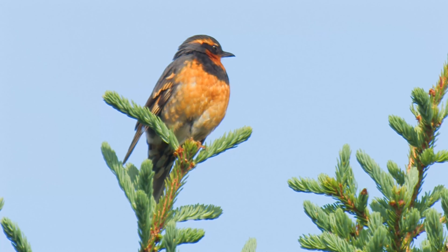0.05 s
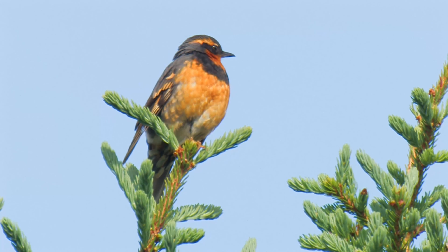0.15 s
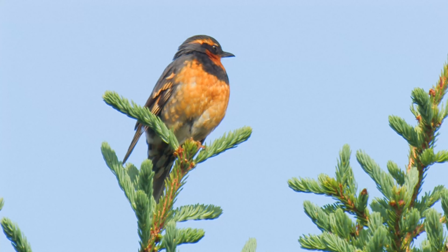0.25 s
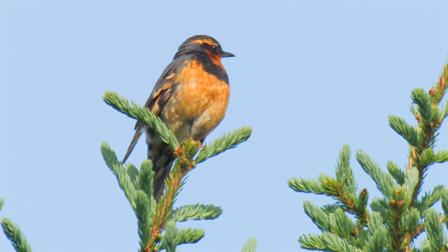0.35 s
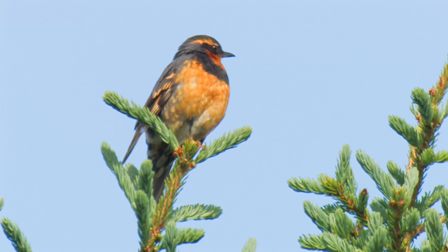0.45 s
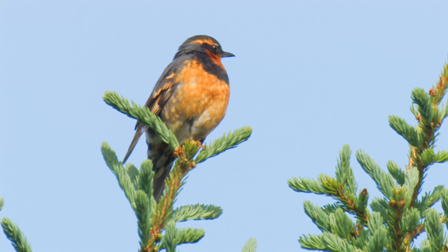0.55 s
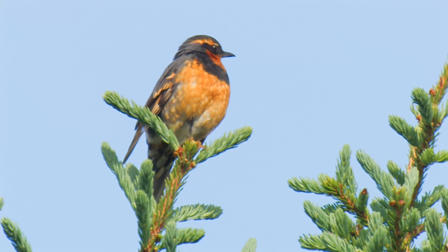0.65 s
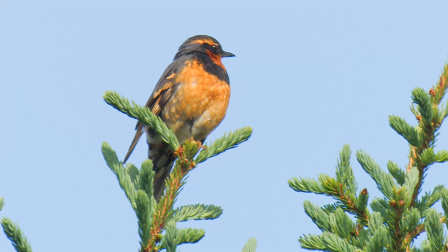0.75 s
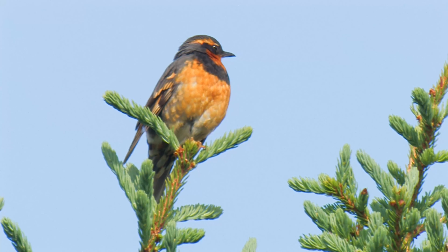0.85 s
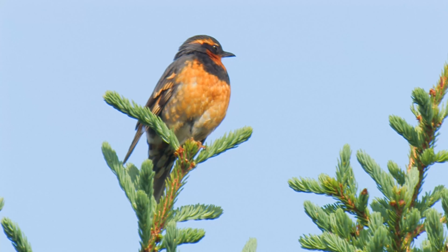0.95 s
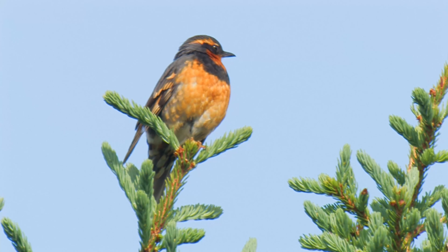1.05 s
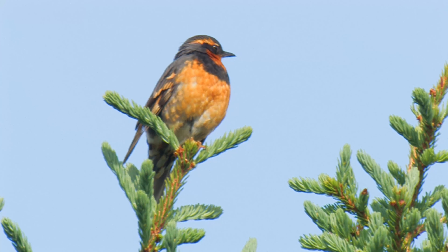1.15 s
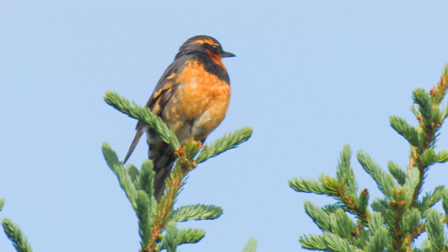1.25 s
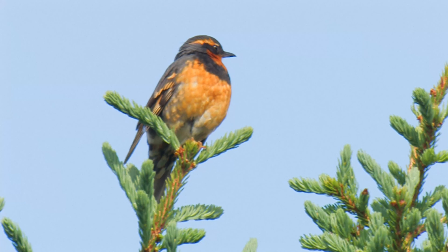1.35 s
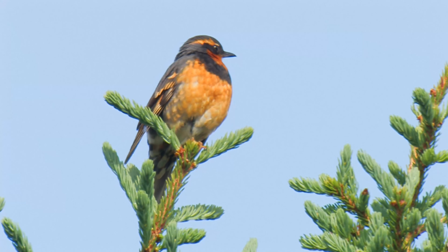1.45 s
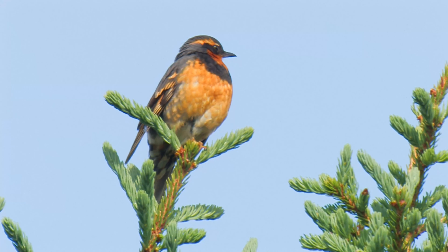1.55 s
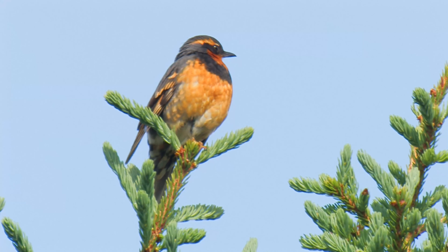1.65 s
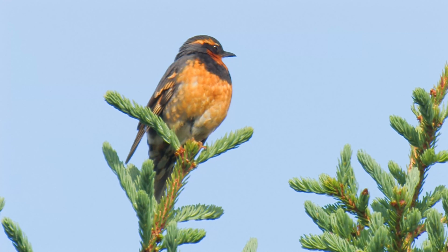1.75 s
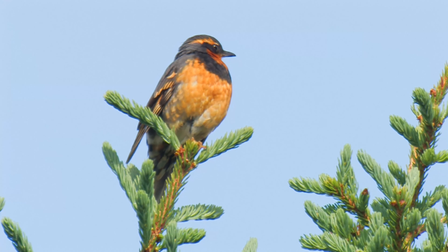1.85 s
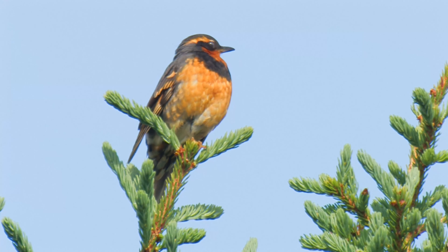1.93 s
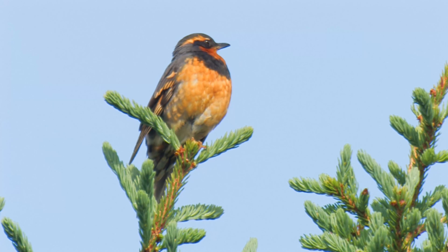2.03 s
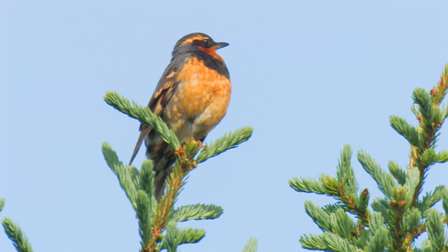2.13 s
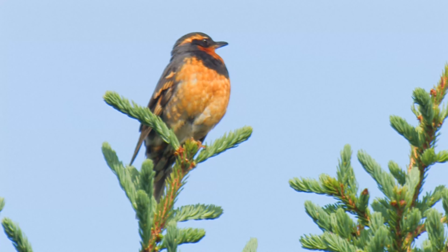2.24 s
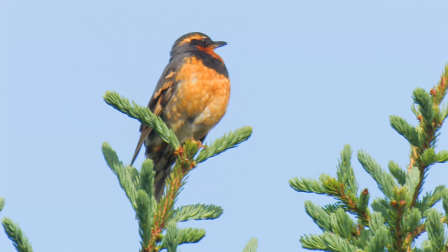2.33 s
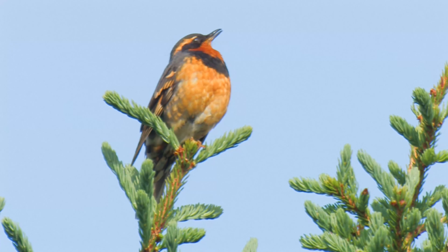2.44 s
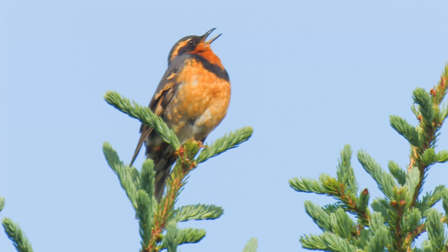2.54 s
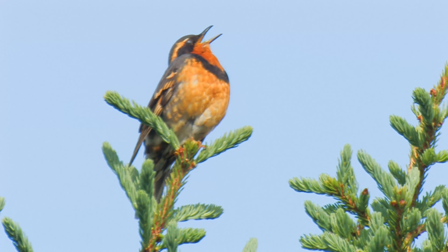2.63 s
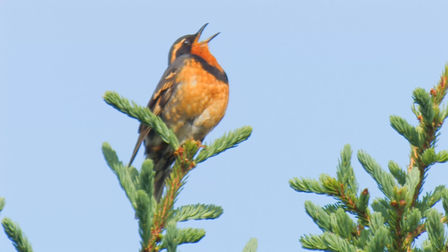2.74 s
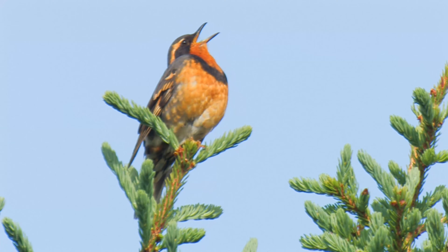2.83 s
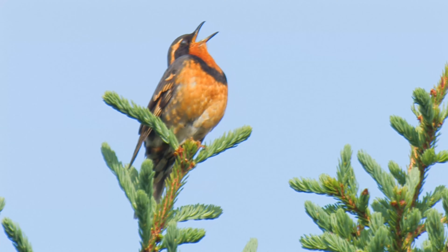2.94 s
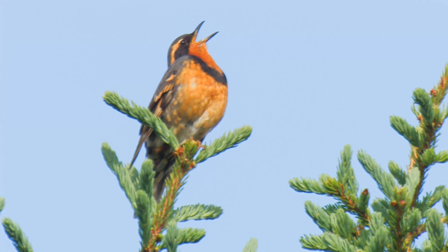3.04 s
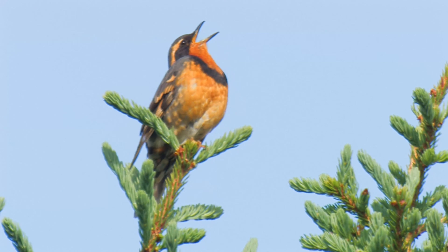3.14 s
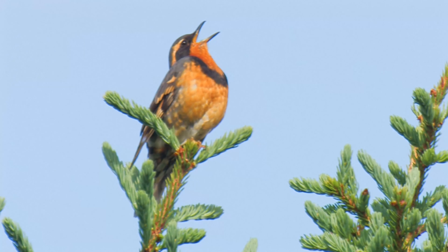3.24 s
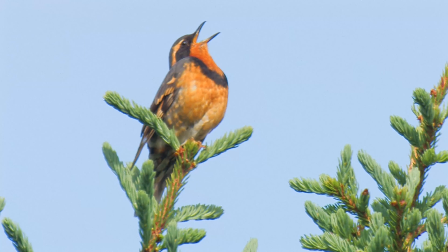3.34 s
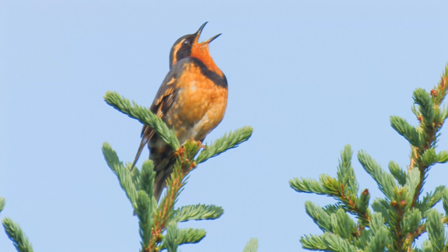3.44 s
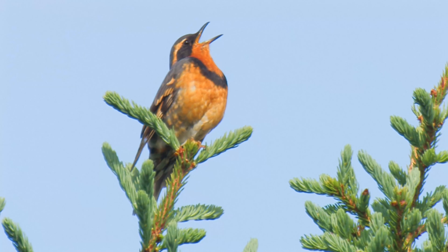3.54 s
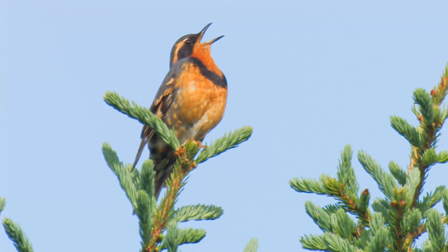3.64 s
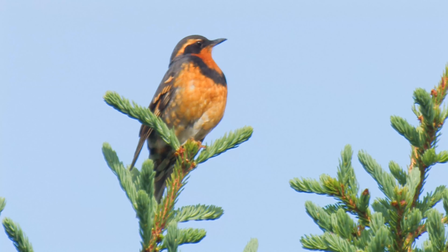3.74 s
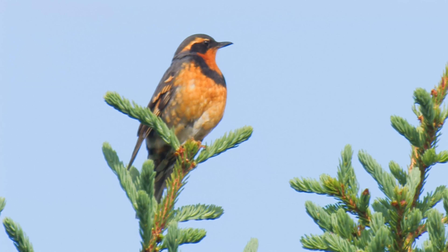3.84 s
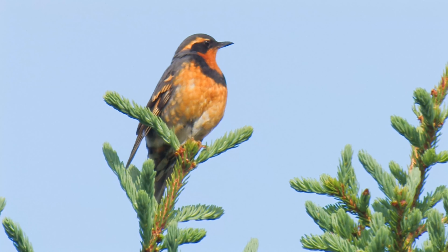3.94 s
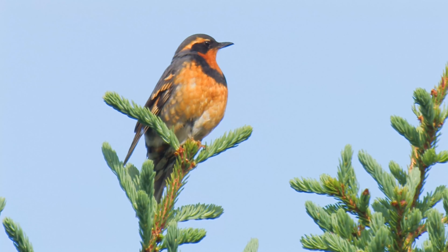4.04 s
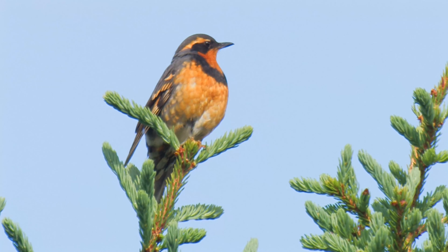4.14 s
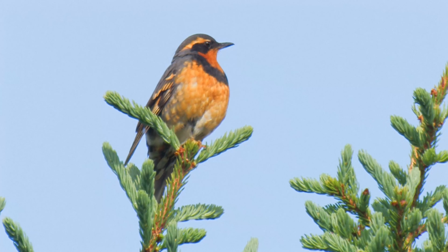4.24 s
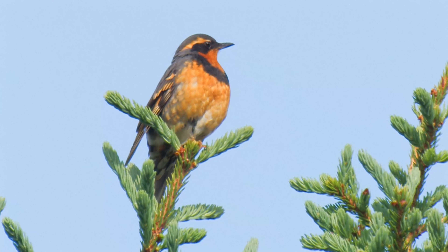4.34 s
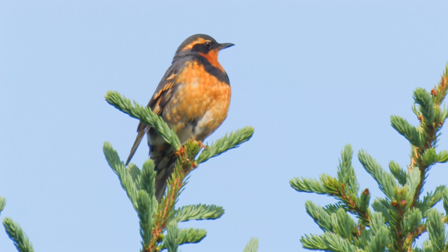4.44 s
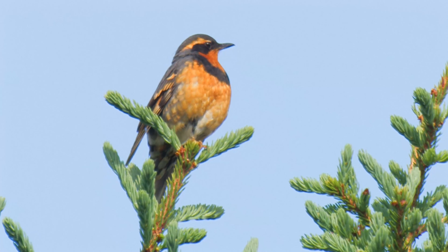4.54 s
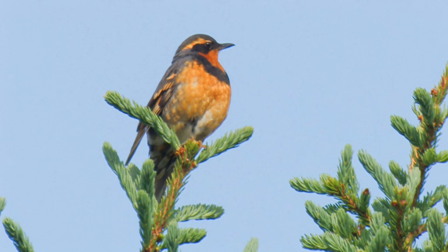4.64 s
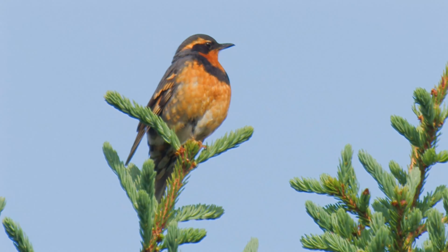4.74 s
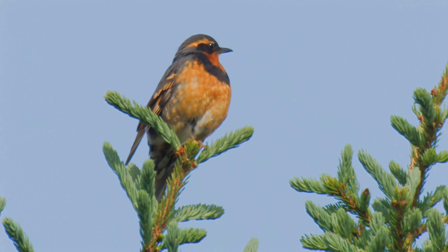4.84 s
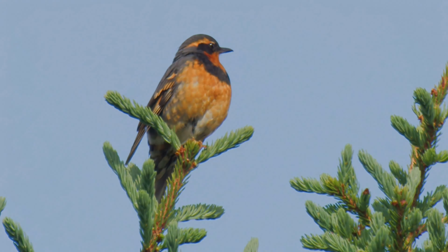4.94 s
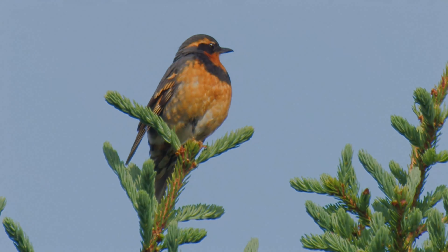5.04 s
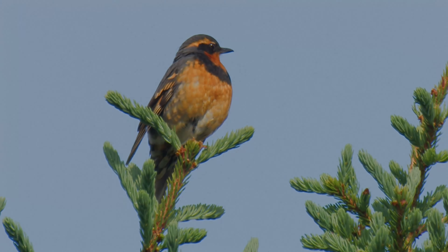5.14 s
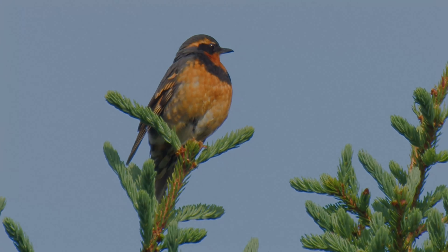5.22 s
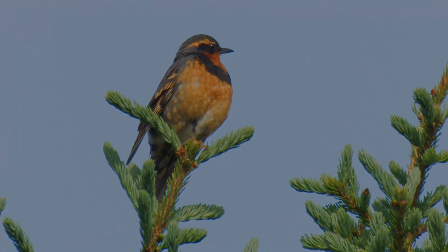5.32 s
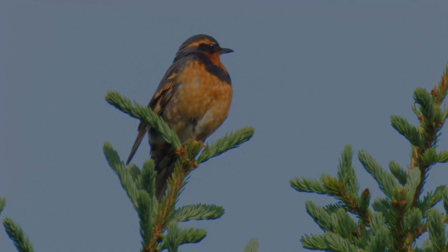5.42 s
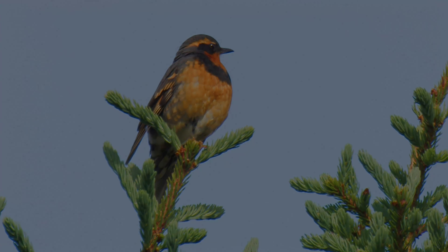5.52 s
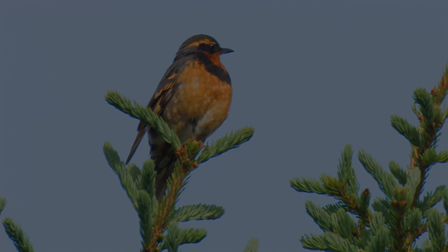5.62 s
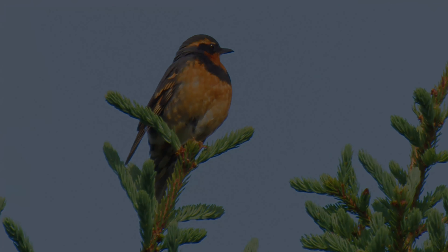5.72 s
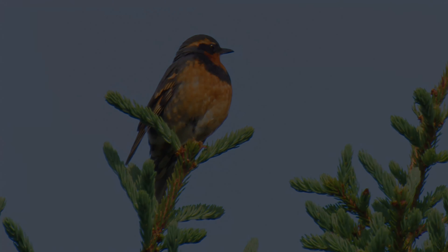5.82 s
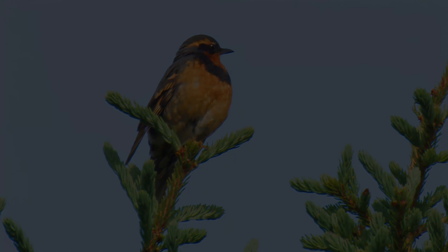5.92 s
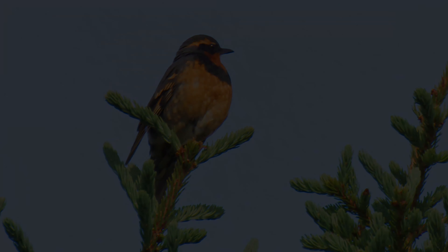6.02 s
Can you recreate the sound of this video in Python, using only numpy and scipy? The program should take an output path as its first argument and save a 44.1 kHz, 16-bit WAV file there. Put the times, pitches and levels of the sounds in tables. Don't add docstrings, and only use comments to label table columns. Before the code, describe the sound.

Open forest edge with soft, low distant wind. A warbler already in song tosses out quick slurs and chatter, blurred by tree echoes. Fainter birds repeat phrases and twitter far off. A nearer thrush then gives one long, level, buzzy whistle, sagging slightly before a short final push. After a brief gap, another bird trills rapid sharp down-slurs as everything fades. The microphone is outdoors at some distance, with woodland echo.

```python
import sys
import numpy as np
from scipy import signal
from scipy.fft import rfft, irfft
from scipy.io import wavfile
from scipy.ndimage import uniform_filter1d

SR = 44100
rng = np.random.default_rng(int(sys.argv[2]) if len(sys.argv) > 2 else 0)


def output_pcm(signal):
    pcm = np.clip(np.atleast_2d(signal).T, -1, 1) * 32767
    wavfile.write(sys.argv[1], SR, np.round(pcm).astype(np.int16))


def nominal_scale(level):
    x = np.asarray(level, float) / 20
    return 10 ** x


N = 267951

# bend (under 1 = quick start), start_db, end_db
RISE, HOOK, FALL, PLAIN = (1.4, -9.5, 0), (.4, 0, -4.5), (1.6, -6, 0), (1.2, 0.5, -2.2)


def evened(x):
    return x / np.sqrt(np.mean(x ** 2) + 1e-20)


def add(mix, start_s, sound):
    part = mix[round(start_s * SR):][:len(sound)]
    part += sound[:len(part)]


def coloured(points):
    hz, db = np.transpose(points)
    log_hz = np.log(np.fft.rfftfreq(N, 1 / SR) + 1)
    shape_db = np.interp(log_hz, np.log(hz), db, right=-90)
    return evened(irfft(rfft(rng.standard_normal(N)) * nominal_scale(shape_db), N))


def drift(size, smooth_samples):
    noise = rng.standard_normal(size)
    for _ in range(2):
        noise = uniform_filter1d(noise, smooth_samples)
    return evened(noise)


def note(mix, rows, start_s=0, pitch=1, db=0):
    s, hz, level_db = np.transpose(rows)
    t = np.arange(s[0], s[-1], 1 / SR)
    glide_hz = uniform_filter1d(np.interp(t, s, hz), len(t) // 8) * pitch
    tone = np.sqrt(2) * np.sin(2 * np.pi * (np.cumsum(glide_hz) / SR + rng.random()))
    envelope = nominal_scale(np.interp(t, s, level_db) + db) * signal.windows.tukey(len(t), .3)
    add(mix, start_s + s[0], tone * envelope)


def slur(mix, start_s, length_s, from_hz, to_hz, db, kind):
    bend, start_db, end_db = kind
    u = np.linspace(0, 1, 9)
    hz = from_hz + (to_hz - from_hz) * u ** bend
    swell_db = start_db + (end_db - start_db) * u
    note(mix, np.transpose([u * length_s, hz, swell_db]), start_s, db=db)


def forest(x, t60_s, gap_s):
    t = np.arange(2 * SR) / SR
    sparse = rng.standard_normal(len(t)) * (rng.random(len(t)) < .05)
    taps = sparse * nominal_scale(-60 * t / t60_s) * (t > gap_s)
    return signal.fftconvolve(x, taps / np.linalg.norm(taps))[:len(x)]


def thrush():
    # s, pitch_hz, level_db
    whistle = [
        (2.651, 3046, -37.5),
        (2.731, 3024, -39),
        (2.899, 2995, -35.5),
        (3.31, 2998, -30.5),
        (3.4, 2985, -32.5),
        (3.56, 2969, -33.5),
        (3.63, 2934, -31),
        (3.729, 2895, -31),
        (3.806, 2940, -35.5),
    ]
    # s, level_db, sidebands_db
    last_push = [
        (3.795, 0, 0),
        (3.81, -4, 0),
        (3.825, 5.5, -8),
        (3.84, 3, -8),
    ]
    # hz, db
    breath = [(1900, -35.5), (2300, -12), (2700, -1), (3000, 0), (3400, -10), (4200, -9.5), (5800, -28)]
    # level_db, one per offset in beats from the main voice
    faint_db = [-26, -19, -2, -12]
    faint_beats = (-3, -2, 2, 3)
    # level_db below the main voice, one per (multiple, offset in beats)
    overtone_db = [-41.5, -51, -48.5, -39.5, -52, -45]
    overtone_places = ((2, 0), (2, -1), (3, 0), (3, -1), (3, -2), (3, 1))

    s, pitch_hz, whistle_db = np.transpose(whistle)
    t = np.arange(s[0] - .015, last_push[-1][0], 1 / SR)
    size = len(t)
    hz = np.interp(t, s, pitch_hz)
    attack_db, attack_s = -20, .04
    level = np.interp(t, s, whistle_db) + attack_db * np.exp((s[0] - t) / attack_s)
    gap_hz = 145 + .14 * abs(hz - 2970)
    second = -6.3 - .12 * abs(hz - 2988)
    upper = np.clip(-28 + 24.5 * (t - 2.88), -28, -16.5)
    air = -59 + 1.2 * (level + 33.5) - 120 * np.maximum(t - 3.615, 0)

    push_s, push_db, purer_db = np.transpose(last_push)
    level += np.interp(t, push_s, push_db)
    purer = np.interp(t, push_s, purer_db)
    second, upper = second + purer, upper + purer

    main = 2 * np.pi * np.cumsum(hz + 5.8 * drift(size, 220)) / SR
    beat = 2 * np.pi * np.cumsum(gap_hz + 3.7 * drift(size, 400)) / SR
    tone = np.sin(main) + nominal_scale(second) * np.sin(main - beat) + nominal_scale(upper) * np.sin(main + beat - 2.2)
    for k, db in zip(faint_beats, faint_db):
        feed = second if k < 0 else np.minimum(upper, second - 8)
        tone += nominal_scale(db + 2 * feed + 2 * drift(size, 2000)) * np.sin(main + k * beat)
    strain = nominal_scale(.8 * (level + 32) + np.minimum(second + 11, 0) + .25 * (upper + 22))
    for (multiple, k), db in zip(overtone_places, overtone_db):
        tone += strain * nominal_scale(db + 1.8 * drift(size, 600)) * np.sin(multiple * main + k * beat)
    tone *= np.sqrt(2) * nominal_scale(level + 1.4 + 0.53 * drift(size, 250))
    tone += nominal_scale(air) * coloured(breath)[:size]

    out = np.zeros(N)
    add(out, t[0], tone * signal.windows.tukey(size, .02))
    near = forest(out, t60_s=.6, gap_s=.035)
    far = forest(out, t60_s=1.75, gap_s=.04)
    return out + nominal_scale(-16) * near + nominal_scale(-25) * far


def trill():
    # s, pitch_hz, level_db
    slide = [(-.010, 5587, -20), (0, 5240, -7), (.008, 4970, -2), (.014, 4497, 0.5), (.018, 4084, 10.5)]
    # s, pitch_hz, level_db
    flick = [(0, 7450, -36), (.003, 5856, -13), (.006, 4500, -3), (.009, 3590, -7)]
    flicks = [
        (0.0154, 1.5),
        (0.0213, -1.5),
    ]
    first_s, period_s, slowing_s = 4.2995, .05895, 4.8e-5
    soft_db, swell_s = -17, 0.2
    out = np.zeros(N)
    for k in range(30):
        start_s = first_s + period_s * k + slowing_s * k ** 2
        db = -42.5 + soft_db * np.exp((first_s - start_s) / swell_s)
        pitch = 1 + .006 * rng.standard_normal()
        note(out, slide, start_s, pitch, db)
        for late_s, flick_db in flicks:
            note(out, flick, start_s + late_s * pitch ** 4, pitch, db + flick_db)
    add(out, .0055, nominal_scale(-2.5) * out.copy())
    return out + nominal_scale(-11) * forest(out, t60_s=0.56, gap_s=0.027)


def warbler():
    # start_s, length_s, from_hz, to_hz, level_db
    rises = [
        (.005, 0.072, 3220, 4010, -46),
        (.035, .025, 4600, 5050, -58),
        (.24, .065, 3265, 4140, -45),
    ]
    # start_s, length_s, from_hz, to_hz, level_db
    hooks = [
        (.132, 0.02, 5360, 4510, -50),
        (.318, 0.023, 5730, 4360, -50),
        (.472, .06, 3200, 3860, -48.5),
        (.688, 0.0483, 3270, 3625, -55.5),
        (.755, .035, 3560, 3620, -68),
    ]
    # start_s, length_s, from_hz, to_hz, level_db
    falls = [
        (.14, 0.057, 5700, 4470, -46),
        (.372, .078, 5780, 4390, -49.5),
        (.6, .06, 5790, 4510, -53),
    ]
    # start_s, length_s, from_hz, to_hz, level_db
    links = [
        (0, 0.022, 4930, 4820, -54.5),
        (.13, 0.012, 4960, 5700, -51),
        (.455, 0.0153, 3550, 3090, -61),
        (.58, 0.0133, 4680, 5360, -50),
        (.655, 0.0112, 4800, 3350, -60),
        (.73, 0.019, 3670, 3050, -61),
    ]
    # share of length, share of pitch span, level_db
    stroke = [(0, 1, -2), (0.45, 0.363, -0.5), (.7, 0.05, 0.5), (0.999, 0.022, -1.5)]
    first_s, last_s, strokes = -.25, .97, 24
    bottom_hz, top_hz = 4300, 6050
    lead = round(-first_s * SR)
    clear, chatter = np.zeros(N + lead), np.zeros(N + lead)
    for rows, kind in ((rises, RISE), (hooks, HOOK), (falls, FALL), (links, PLAIN)):
        for start_s, *shape in rows:
            slur(clear, start_s - first_s, *shape, kind)

    share, span, stroke_db = np.transpose(stroke)
    for k, (late, length, top, loud) in enumerate(rng.random((strokes, 4))):
        start_s = first_s + (k + .8 * late) / strokes * (last_s - first_s)
        hz = bottom_hz + span * (top_hz - bottom_hz) * (.85 + 0.256 * top) - 300 * late ** 2
        rows = np.transpose([share * (0.0137 + 0.026 * length), hz, stroke_db])
        effort_db = -51 + 0.5 * start_s - 110 * max(start_s - 0.7, 0)
        note(chatter, rows, start_s - first_s, db=effort_db + 5.1 * (loud - .5))
    scatter = forest(nominal_scale(-1.5) * clear + nominal_scale(3) * chatter, t60_s=0.59, gap_s=.005)
    return (clear + nominal_scale(-5.5) * chatter + scatter)[lead:]


def far_birds():
    # s, pitch_hz, level_db
    phrase = [
        [(0, 5058, 9), (.015, 4482, -3.5), (.045, 4204, -0.5), (.09, 4053, -2.5)],
        [(.078, 3964, -3.5), (.088, 3590, -4.5), (.1, 3100, -11)],
        [(.085, 4280, -6.5), (.11, 3900, -5), (.13, 3625, -7.5)],
        [(.115, 2975, -9), (.125, 3317, 2), (.133, 3350, -3.5)],
    ]
    # start_s, pitch_factor, level_db
    phrases = [
        (0.953, 1, -70),
        (1.146, 0.99, -66),
        (1.335, 0.99, -60.5),
        (1.522, 0.99, -58),
        (1.706, 1.01, -60),
        (1.89, 1.006, -59),
        (2.074, 1.02, -56),
    ]
    # s, pitch_hz, level_db
    peep = [(0, 2620, -9.5), (.015, 2780, -6), (.022, 3050, 3)]
    out, peeps = np.zeros(N), np.zeros(N)
    for start_s, pitch, db in phrases:
        for rows in phrase:
            note(out, rows, start_s, pitch * rng.normal(1, .008), db + rng.normal(0, 1))
    add(out, .045, nominal_scale(-13) * out.copy())
    for k in range(10):
        note(peeps, peep, 1.835 + k * .0844, db=-67 + k * .35)
    scatter = forest(nominal_scale(0.2) * out + nominal_scale(-4) * peeps, t60_s=0.84, gap_s=.006)
    return nominal_scale(-1) * out + peeps + scatter


def twitter():
    # start_s, level_db
    high_strokes = [(2.255, -65), (2.29, -64), (2.315, -70), (2.34, -70), (2.37, -65), (2.41, -70),
                    (2.44, -69), (2.475, -74), (2.51, -71), (2.55, -77)]
    # start_s, level_db
    low_strokes = [(2.305, -58), (2.345, -61.5), (2.41, -62), (2.46, -63), (2.53, -64.5), (2.57, -65)]
    # start_s, length_s, from_hz, to_hz, level_db
    chips = [(.385, .025, 2330, 2410, -74), (0.417, .03, 2540, 2770, -74), (0.572, 0.013, 2340, 2280, -67),
             (0.58, .035, 1940, 2040, -74), (.805, 0.011, 2400, 2260, -72), (.92, 0.046, 2786, 2790, -72.5),
             (.98, .04, 3200, 3310, -76), (1.745, 0.069, 4180, 4158, -58), (1.91, 0.072, 4410, 4440, -63),
             (2.745, .01, 5410, 3800, -68), (3.76, 0.082, 4150, 4000, -78.5), (3.87, .09, 4100, 3950, -78),
             (3.998, .05, 3930, 4150, -77), (4.15, .06, 4000, 4170, -79), (4.233, 0.047, 3480, 3650, -79),
             (4.466, 0.027, 3634, 3530, -73)]
    high_hz, low_hz, stroke_s = (5020, 5770), (4270, 4780), .026
    out = np.zeros(N)
    for k, (start_s, db) in enumerate(high_strokes):
        slur(out, start_s, stroke_s, *high_hz[::(-1) ** k], db, PLAIN)
    for start_s, db in low_strokes:
        slur(out, start_s, stroke_s, *low_hz, db, HOOK)
    for row in chips:
        slur(out, *row, PLAIN)
    return out + nominal_scale(-1) * forest(out, t60_s=.35, gap_s=.004)


def background():
    # hz, db
    wash = [(20, -4.5), (90, -1), (250, -6.5), (760, -7.5), (1400, -21.5), (2200, -26.5), (6500, -30.5),
            (16000, -32.5)]
    # pitch_hz, level_db
    insect = [(6810, -82)]
    t = np.arange(N) / SR
    out = nominal_scale(-56 + .4 * drift(N, 9000)) * coloured(wash)
    for hz, db in insect:
        out += np.sqrt(2) * nominal_scale(db - 0.5) * np.sin(2 * np.pi * hz * t + 1.3 * drift(N, 2500))
    return out


def scene():
    return (thrush() + trill() + warbler() + far_birds() + twitter() + background())[None]


def roll_off(x):
    return signal.sosfilt(signal.butter(12, 16630, fs=SR, output="sos"), x)


def record(dry):
    fade_start_s, fade_end_s = 4.43, 6.178
    left = np.clip((fade_end_s - np.arange(N) / SR) / (fade_end_s - fade_start_s), 0, 1)
    return roll_off(dry * left ** 1.55)


dry = scene()
out = record(dry)
output_pcm(out)
```